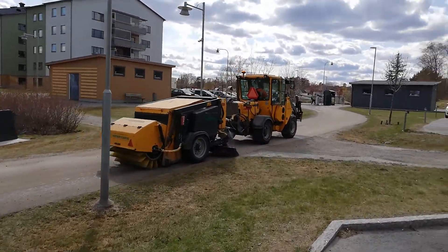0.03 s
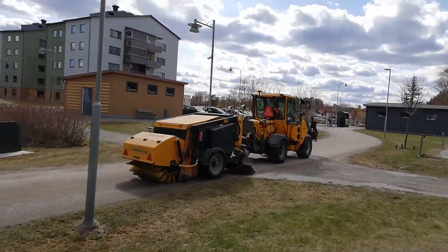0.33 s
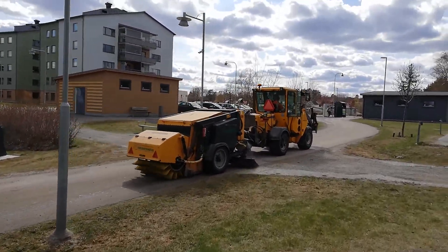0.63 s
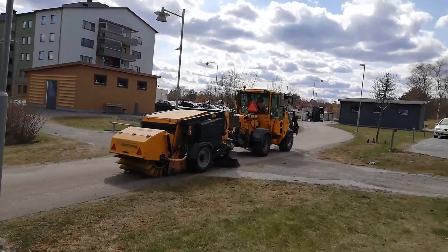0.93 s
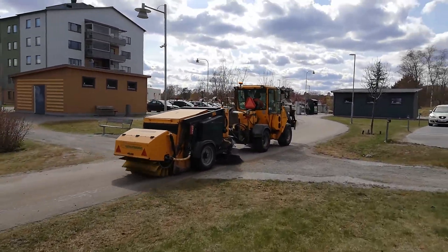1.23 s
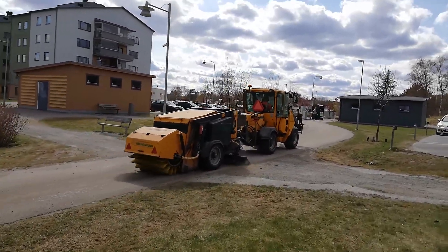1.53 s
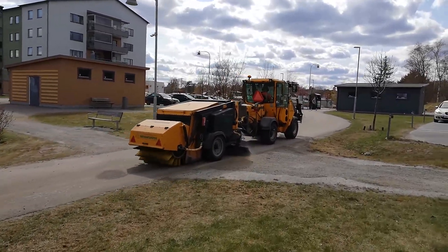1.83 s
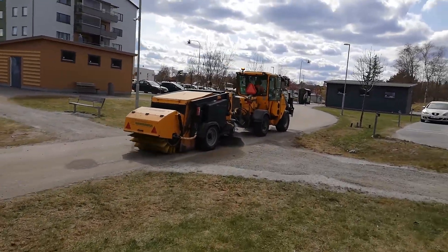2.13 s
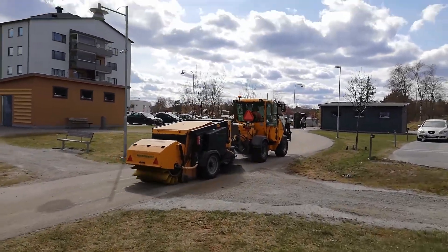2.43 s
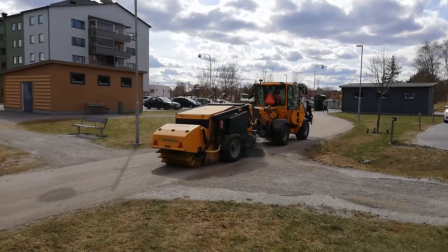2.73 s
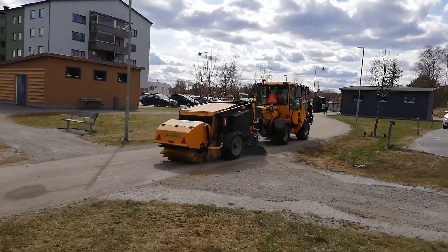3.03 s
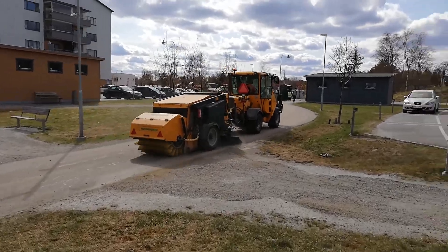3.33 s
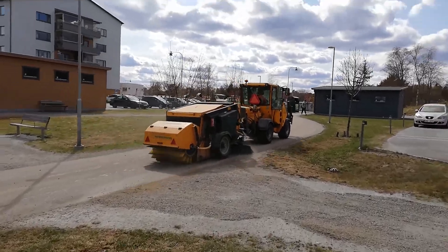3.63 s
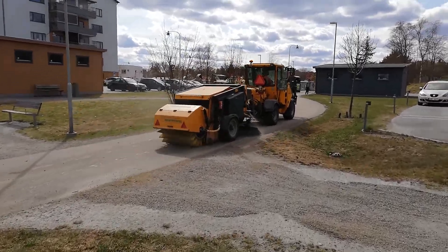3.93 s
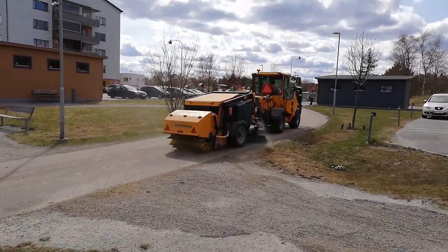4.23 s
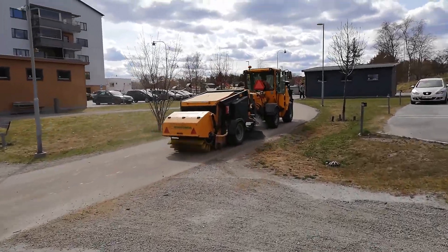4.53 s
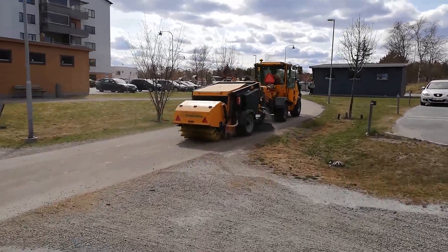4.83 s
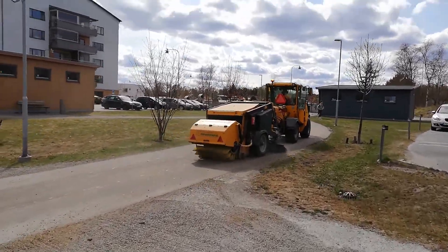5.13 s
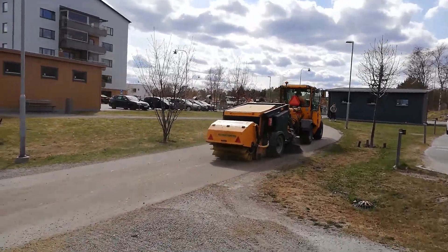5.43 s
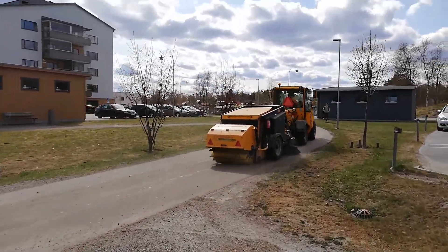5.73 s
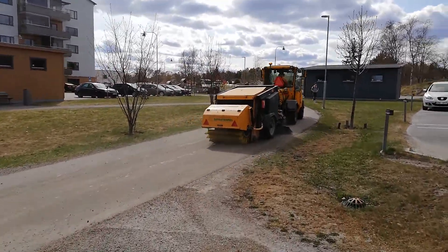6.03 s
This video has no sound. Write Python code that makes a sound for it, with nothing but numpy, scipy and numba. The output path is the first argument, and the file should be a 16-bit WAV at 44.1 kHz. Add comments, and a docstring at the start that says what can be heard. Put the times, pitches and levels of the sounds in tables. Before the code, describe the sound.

A small diesel tractor tows a rotary sweeper along a paved path, a few metres from the microphone. The engine hums and clatters steadily while the bristles make a bright, throbbing hiss over a low roar. Three dull clunks come early on. Gusts buffet the microphone from the start, then ease. Past the middle, the hiss changes tone as the machine turns away, and the wind stirs once more near the end.

```python
"""A small diesel tractor tows a rotary sweeper away along a paved path, a few metres from a phone.
From the start, gusts buffet the microphone, the engine hums and clatters, and the bristles hiss and
throb with each turn of the brush drive. In the first 1.5 s the hopper (the dirt bin) clunks three
times. Its roar echoes off a house wall on the left, which is passed at about 4 s. Around then the
machine turns its back and the hiss changes colour. The wind eases, stirring once more near the end."""
import sys
import numpy as np
from scipy import signal
from scipy.fft import rfft, irfft
from scipy.io import wavfile
from scipy.ndimage import uniform_filter1d, minimum_filter1d, map_coordinates
from numba import njit

SR = 44100
rng = np.random.default_rng(int(sys.argv[2]) if len(sys.argv) > 2 else 0)


def transcribe(u):
    """Save the signal u as a 16-bit wav file named by the first command-line argument.

    u: samples, shape (n,) or (channels, n), limited to [-1, 1]; the rate is SR.
    q: integer samples, one column per channel.
    """
    v = np.clip(np.atleast_2d(u).T, -1, 1)
    q = np.round(v * 32767).astype(np.int16)
    wavfile.write(sys.argv[1], SR, q)


N = 268569
TIME = np.arange(N) / SR
FREQ = np.arange(N // 2 + 1) * SR / N + 1e-3
PAN = np.array([[.5], [-.5]])  # splits a dB difference between the channels; positive favours the left


def undb(db):
    """Turn decibels into a factor to multiply by."""
    return 10 ** (np.asarray(db) / 20)

def unit(x):
    """Scale a signal to an average (rms) size of 1."""
    return x / np.sqrt(np.mean(x ** 2))

def curves(table):
    """Join a table's time points with straight lines, one curve per value column."""
    times, *columns = np.transpose(table)
    return [np.interp(TIME, times, column) for column in columns]

def bells(table):
    """Add up bell-shaped rises, one curve per rise column."""
    return sum(np.outer(rises, np.exp(-(2 * (TIME - s) / length) ** 2)) for s, length, *rises in table)

def shape(x, gain):
    """Filter a signal with a gain for every frequency."""
    return irfft(rfft(x) * gain, N)

def colour(table):
    """Turn a table of tone colour into a gain for every frequency, one row per dB column."""
    hz, *columns = np.transpose(table)
    return undb([np.interp(np.log(FREQ), np.log(hz), column) for column in columns])

def highpass(hz, order):
    """Gains that fade out the sound below hz; a higher order cuts more steeply."""
    return 1 / np.sqrt(1 + (hz / FREQ) ** (2 * order))

def walk(rate_hz):
    """A smooth random wobble of average size 1."""
    hold = max(int(SR / rate_hz), 1)
    steps = np.repeat(rng.standard_normal(N // hold + 1), hold)
    return unit(uniform_filter1d(uniform_filter1d(steps, hold), hold)[:N])

def flicker(rate_hz, slowest_hz=16):
    """A quick wobble with its slow part taken out."""
    wobble = walk(rate_hz)
    return unit(wobble - uniform_filter1d(wobble, int(SR / slowest_hz)))

def stereo_noise(likeness):
    """Left and right noise, from unrelated (likeness 0) to identical (1)."""
    shared = np.sqrt(likeness) * rng.standard_normal(N)
    return shared + np.sqrt(1 - likeness) * rng.standard_normal((2, N))

@njit
def sliding_filter(x, hz, damping):
    """Return the sound below a moving frequency, and the band around it."""
    low, band = np.empty(len(x)), np.empty(len(x))
    band_state, low_state = 0., 0.
    for i in range(len(x)):
        g = np.tan(np.pi * min(hz[i], .4 * SR) / SR)
        v = (band_state + g * (x[i] - low_state)) / (1 + g * (g + damping))
        low[i], band[i] = low_state + g * v, damping * v
        band_state, low_state = 2 * v - band_state, 2 * low[i] - low_state
    return low, band

def ring(pair, hz, damping):
    """Make both channels ring around hz; less damping gives a clearer pitch."""
    once = [sliding_filter(x, hz, damping)[1] for x in pair]
    return unit(np.array([sliding_filter(x, hz, damping)[1] for x in once]))

def puff(low_hz, high_hz, rise_s, order=3):
    """A short swell of noise with a peak of 1."""
    age = np.arange(SR // 10) / SR
    band = signal.butter(order, [low_hz, high_hz], "band", fs=SR, output="sos")
    swell = signal.sosfilt(band, rng.standard_normal(len(age))) * age * np.exp(-age / rise_s)
    return swell / np.abs(swell).max()


# Sharp hits of wind: (time [s], push peak [dB], thud peak [dB], slap peak [dB])
WIND_HITS = [(0.277, -29, -20, -18), (0.335, -30, -17, -15.5), (0.365, -18, -23, -16),
             (0.423, -9, -13, -14), (0.444, -23, -9.5, -13), (0.476, -30, -22, -16), (0.553, -7, -9, -11),
             (0.588, -22, -14, -29), (.64, -24, -14, -20), (0.691, -21, -16.5, -16), (0.779, -30, -10, -10),
             (.82, -33, -25, -26), (0.854, -18, -29, -30), (0.935, -28, -12, -31), (0.991, -13, -23, -22),
             (1.041, -18, -16, -18), (1.115, -27, -13.5, -40), (1.358, -19, -12.5, -25),
             (1.43, -24, -14, -30), (1.469, -25, -14, -17), (1.503, -26, -17.5, -13),
             (1.591, -17, -23, -22), (1.705, -17.5, -20, -32), (1.87, -26, -30, -29),
             (2.055, -17, -15, -30), (2.174, -19, -27, -15.5), (2.274, -16, -20.5, -28),
             (2.365, -17.5, -25, -28), (2.497, -19, -17, -11), (2.575, -35, -19, -29),
             (2.625, -32, -9, -11), (2.667, -30, -31, -15), (2.77, -28, -14, -19), (2.831, -19, -11.5, -15),
             (2.896, -30, -24, -14), (3.36, -18, -22, -35), (3.397, -23, -12, -23),
             (3.444, -20, -13.5, -21), (3.54, -23, -14.5, -36), (3.739, -19, -26, -36),
             (3.891, -22, -18, -22), (4.189, -27, -21, -26), (4.561, -25, -29, -27), (5.44, -19, -32, -42),
             (5.487, -17, -12, -21), (5.525, -17.5, -25, -30)]

def buffets(push_s=0.011, thud_s=0.00634, slap_s=0.0051):
    """Single swirls of air hit the microphone: a deep push, a dull thud and a soft slap."""
    out = np.zeros(N)
    for s, push_db, thud_db, slap_db in WIND_HITS:
        thud = undb(thud_db) * puff(88, 276, thud_s)
        slap = undb(slap_db) * puff(260, 590, slap_s, order=2)
        push = undb(push_db) * puff(23, 123, push_s)
        start = int((s - thud_s / 2) * SR)
        out[start:start + len(thud)] += thud + slap + push
    return out


# The breeze, dying down unevenly: (time [s], level [dB])
BREEZE_LEVEL = [(0, -27), (.25, -30.5), (.9, -27.5), (1.25, -35), (2.3, -28), (2.85, -29.5), (3.08, -35),
                (3.5, -35), (4.2, -37), (4.8, -47), (5.75, -32.5), (6.09, -48.5)]
# Gusts on top of the breeze: (peak time [s], length [s], rise [dB])
GUST_RISES = [(0.42, 0.25, 4.5), (0.6, 0.24, 2.5), (.79, 0.045, 4), (0.97, 0.43, 1), (1.12, 0.2, 3.5),
              (1.4, 0.25, 6.5), (1.74, 0.3, 4.2), (2.25, 0.14, 1.5), (2.5, .1, 0), (2.64, 0.11, 0.5),
              (2.81, 0.19, 3.5), (3.29, 0.055, 3.5), (3.41, 0.2, 6.5), (3.545, 0.061, 4.5), (3.87, 0.17, 4),
              (4.15, 0.11, 3), (5.485, 0.14, 0)]
# Tone colour of slow swirls of air: (frequency [Hz], relative level [dB])
RUMBLE_COLOUR = [(14, -2), (26, -5), (42, 9), (60, 7.5), (110, 5), (170, 1.5), (260, -1), (500, -22)]

def wind(flutter_db=-31.5, flutter_growth=0.91, swirl_hz=320, right_lag_s=0.00088, right_dull_hz=520):
    """Air swirls over the microphone openings; stronger gusts shed smaller swirls that flutter higher."""
    strength_db = curves(BREEZE_LEVEL)[0] + bells(GUST_RISES)[0]
    excess_db = strength_db - strength_db.mean()
    rumble = unit(shape(stereo_noise(1), colour(RUMBLE_COLOUR)))
    rumble *= undb(strength_db + 0.5 + 3 * walk(25.18))
    cutoff_hz = swirl_hz * 2 ** (excess_db / 26 + 0.14 * walk(50))  # an octave up per 26 dB
    swirls = np.array([sliding_filter(x, cutoff_hz, damping=1.9)[0] for x in stereo_noise(0.7)])
    flutter = unit(shape(swirls, highpass(83, order=3)) * undb(3 * flicker(80)))
    flutter *= undb(flutter_db + flutter_growth * excess_db)
    left, right = rumble + buffets() + shape(flutter, 1 - highpass(1040, order=3))
    # the air reaches the sheltered right opening later, and sounds duller there
    delay = np.exp(-2j * np.pi * FREQ * right_lag_s)
    shelter = 1 / np.sqrt(1 + (FREQ / right_dull_hz) ** 2)
    return np.array([left, shape(right, delay * shelter)])


# Echo off the paving: (time [s], delay [s])
ECHO_DELAY = [(0, .00146), (2.8, .00149), (3.6, .00165), (5, .00177), (5.45, .00169), (6.09, .00184)]

def paving_echo(pair, echo_db=-14.5, soft_hz=3200):
    """The paving mirrors the machine; the changing delay slides a ripple through the middle tones."""
    positions = (TIME - curves(ECHO_DELAY)[0]) * SR
    middle = shape(pair, highpass(590, order=3) / np.sqrt(1 + (FREQ / soft_hz) ** 6))
    echo = np.array([map_coordinates(x, [positions], order=1, mode="mirror") for x in middle])
    return pair + undb(echo_db) * echo


# Knocks on the hopper: (time [s], level [dB])
CLUNK_HITS = [(.358, -25), (1.037, -29), (1.463, -19.5)]
# Tones in each knock: (frequency [Hz], relative level [dB], time to fade by 60 dB [s])
CLUNK_TONES = [(753, -6, 0.062), (887, -5, 0.052), (1020, -2, 0.029)]

def clunks(attack_s=.003, pan_db=14):
    """Dull clunks, probably stones thrown against the hopper."""
    out = np.zeros((2, N))
    for s, level_db in CLUNK_HITS:
        age = np.maximum(TIME - s, 0)
        ringing = sum(undb(db - 60 * age / fade_s) * np.sin(2 * np.pi * (hz * age + rng.random()))
                      for hz, db, fade_s in CLUNK_TONES)
        out += ringing * (1 - np.exp(-age / attack_s)) * undb(level_db + PAN * pan_db)
    return out


# The drive that spins the brush: (time [s], speed [turns/s], throb strength [factor])
BRUSH_DRIVE = [(0, 18.6, 1.1), (.9, 19.05, 1.1), (1.6, 18.55, 1), (2.7, 18.45, 1), (3.5, 18.9, .8),
               (4.4, 18.95, .8), (5.2, 18.5, .8), (6.09, 18.9, .8)]

def drive():
    """The spinning drive: its turns so far, and how strongly it makes the bristles throb."""
    turn_hz, strength = curves(BRUSH_DRIVE)
    return np.cumsum(turn_hz) / SR, strength


# Tone colour of the hopper, fan and tyres: (frequency [Hz], left level [dB], right level [dB])
ROAR_COLOUR = [(25, -25, -21), (85, -16.5, -20), (141, -15.5, -13.5), (172, -26, -32), (219, -15, -20),
               (314, -26, -24.5), (436, -36, -29), (560, -30.5, -22.5), (685, -29.5, -26),
               (815, -33, -24.5), (935, -27.5, -29), (1620, -32, -25.5), (2180, -25, -21.5)]
# The roar swells while the house wall throws it back: (time [s], left gain [dB], right gain [dB])
WALL_SWELL = [(0, 5, -0.5), (1.5, 6, 1), (2.8, 6.5, 2.5), (4, 3, 2), (4.5, -1, 2.5), (5.2, -4.5, 1),
              (6.09, -6, 0.5)]

def hopper(shake_db=-42, drone_db=-46, waver_db=2):
    """The hopper roars with fan and tyre noise, shakes twice per turn of the drive, and drones."""
    apart = highpass(307, order=2)  # long waves reach both sides alike, short ones differ
    air = shape(stereo_noise(0.84), np.sqrt(1 - apart ** 2)) + shape(stereo_noise(0.25), apart)
    roar = shape(air, colour(ROAR_COLOUR) * (1 - highpass(1960, order=4))) * undb(curves(WALL_SWELL))
    turns, _ = drive()
    shake = np.sqrt(2) * np.sin(2 * np.pi * 2 * turns)
    drone = np.sqrt(2) * np.sin(2 * np.pi * 6 * turns)
    return roar + shake * undb(shake_db) + drone * undb(drone_db + waver_db * walk(3.7))


# The engine's steady running: (time [s], firing rate [Hz], hum level [dB])
ENGINE_RUN = [(0, 62.4, -35.5), (2, 62.45, -34.5), (3.1, 62.55, -35), (3.6, 62.6, -34.5), (4.6, 62.45, -38),
              (5.3, 62.45, -36), (6.09, 62.4, -36.8)]
# Exhaust and pump tones: (multiple of the firing rate [factor], relative level [dB])
HUM_TONES = [(1, -7.5), (1.5, -15), (2, 0), (3, -6.5), (6.5, -20.5), (8, -22.5), (13, -21.5)]
# Clatter from the engine bay: (time [s], ringing frequency [Hz], level [dB])
BAY_CLATTER = [(0, 1450, -48.5), (1, 1450, -45.5), (2.8, 1380, -45.5), (3.5, 1340, -39), (4, 1304, -39),
               (5, 1205, -42), (5.45, 1300, -39.5), (6.09, 1210, -41)]

def engine(waver_db=2.5, sway_cycles=0.08, knock_db=2.5, drift=0.031, tick_hz=3250, tick_db=-44):
    """The diesel's exhaust hums, and each firing knocks the engine bay and block into ringing."""
    firing_hz, hum_db = curves(ENGINE_RUN)
    firings = np.cumsum(firing_hz * (1 + 0.00206 * walk(7.94))) / SR
    hum = np.zeros(N)
    for multiple, db in HUM_TONES:  # moving air makes each tone waver in level and timing
        level = undb(db + waver_db * flicker(28, slowest_hz=8.6))
        cycles = multiple * firings + rng.random() + sway_cycles * walk(9)
        hum += level * np.sin(2 * np.pi * cycles)
    knocks = stereo_noise(1) * undb(knock_db * np.cos(2 * np.pi * firings))
    bay_hz, clatter_db = curves(BAY_CLATTER)
    clatter = ring(knocks, bay_hz * (1 + drift * walk(12)), damping=0.25)
    clatter *= undb(clatter_db + walk(20) - 4.5 * PAN)
    ticking = ring(knocks, tick_hz * (1 + drift * walk(7)), damping=0.18) * undb(tick_db - 7 * PAN)
    return np.sqrt(2) * hum * undb(hum_db) + clatter + ticking


def bristles(flicks_per_s=9000, spread_db=7, flick_share=0.16):
    """Bristles scrape the paving and their tips snap free: many small ticks, a few large."""
    sizes = undb(spread_db * np.minimum(rng.exponential(size=N), 4))
    snaps = rng.random(N) < flicks_per_s / SR
    flicks = unit(snaps * np.sign(rng.standard_normal(N)) * sizes)
    left, right = np.sqrt(flick_share) * flicks + np.sqrt(1 - flick_share) * stereo_noise(0.12)
    # the sound reaches the left side first until the machine is straight ahead
    lag_samples = np.linspace(6, 0, N).round().astype(int)
    return np.array([left, right[np.arange(N) - lag_samples]])


# Our view of the sweeper; the left microphone opening is shaded once the house is passed:
# (time [s], share seen from behind [0-1], shade on the left [0-1])
SWEEPER_VIEW = [(0, 0.15, 0.44), (3.2, 0.24, 0.18), (3.9, 0.7, 0.43), (4.13, 0.9, 0.6), (4.24, 0.85, 0.9),
                (4.5, 0.8, 0.7), (4.62, 0.7, 1), (5.02, 0.6, 1), (5.15, 0.74, 0.86), (5.8, 1, 1),
                (6.09, 0.9, 1)]
# Tone colour of the hiss from the side: (frequency [Hz], left gain [dB], right gain [dB])
SIDE_COLOUR = [(1910, -4.5, -4), (2590, -2, -1.5), (3020, -.5, 2.5), (3400, -2, 5.5), (4300, -3.2, 2.4),
               (5200, -1, -1.5), (6500, 2, -2), (7850, 6.3, 7.5), (8660, 5.5, 14.5), (9390, 4.5, 18.7),
               (10820, -2.5, 8.7), (12200, -4.5, 3.2), (14500, -7, 3.2), (15700, -9, 4.5)]
# Tone colour of the hiss from behind: (frequency [Hz], left gain [dB], right gain [dB])
REAR_COLOUR = [(1900, -5, -5), (2250, -7, 0), (2550, -9, .5), (2850, -8, 5.8), (3490, -9, 6),
               (4430, -8, -2), (5300, -5, -3.5), (6200, -5.5, -3.5), (7500, -2.8, 9.5), (8900, -2.2, 14.8),
               (9420, -4, 14.6), (11040, -8.5, 7.2), (12000, -11.5, 8), (13300, -13.5, 5),
               (14400, -15.5, -1), (15700, -18, 0)]

def turn_away(hiss):
    """As the machine turns its back, the hiss blends from its side colour to its rear colour."""
    behind, shade = curves(SWEEPER_VIEW)
    low_cut = highpass(1800, order=6)
    side = shape(hiss, colour(SIDE_COLOUR) * low_cut)
    rear = shape(hiss, colour(REAR_COLOUR) * low_cut)
    rear_share = np.array([shade, behind])
    return (1 - rear_share) * side + rear_share * rear


# A deepening dip in the treble: (time [s], centre [Hz], gain [dB])
TREBLE_DIP = [(0, 11400, 0.7), (3.7, 11400, -4), (4.5, 11100, -7), (5.3, 10700, -6), (6.09, 10800, -11)]
# A faint peak that climbs through the hiss: (time [s], centre [Hz], gain [dB])
TREBLE_PEAK = [(0, 5200, 0), (2.4, 6000, 2), (3, 6400, 4.5), (4.05, 6700, 0), (4.5, 7400, 3),
               (5.0, 8300, 1.3), (5.3, 12200, 1), (5.8, 12400, 3.5), (6.09, 12400, 2)]

def sliding_tints(hiss):
    """A narrow dip and a narrow peak slide through the hiss."""
    for table, damping in ((TREBLE_DIP, 0.19), (TREBLE_PEAK, 0.13)):
        hz, db = curves(table)
        hiss = hiss + (undb(db) - 1) * sliding_filter(hiss, hz, damping)[1]
    return hiss


# Overall loudness of the brush: (time [s], level [dB])
HISS_LEVEL = [(0, -24), (.45, -24.5), (1.4, -25), (2.3, -23.5), (2.9, -24), (3.3, -22), (3.8, -22.5),
              (4.5, -23), (6.09, -23)]
# The brush bears down: (peak time [s], length [s], rise [dB], extra rise of the top treble [dB])
HARD_SCRAPES = [(.1, .14, 2.3, 0), (.26, 0.14, 3.3, 0), (.685, 0.093, 0, 4), (.96, 0.24, 1.5, -0.5),
                (1.21, 0.22, 2.3, 1), (1.54, 0.25, 2.5, -0.5), (1.75, 0.21, 1, .3), (2.07, 0.23, 2.5, 1.2),
                (2.34, 0.1, 0, 1.5), (2.54, 0.19, 0.7, 2), (3.3, 0.1, 0, 1), (3.54, 0.13, .8, 2),
                (4.56, 0.13, -0.5, 2)]
# Throb of the bristles: (pulses per drive turn [count], depth before scaling [dB])
THROB_PULSES = [(2, 1.35), (3, 1), (4, 1)]

def brush(tips_hz=5500, left_throb=0.18, rasp_throb=0.35, edge_hz=10800, edge_octaves=0.47):
    """The brush hisses on the paving and throbs as its pressure eases a few times in each drive turn."""
    turns, strength = drive()
    turns += rng.random()
    scrape_db, edge_db = bells(HARD_SCRAPES)
    swell_db = scrape_db + 0.56 * walk(12)
    throb_db = -strength * sum(db * np.cos(2 * np.pi * pulses * turns) for pulses, db in THROB_PULSES)
    # the shaded left side hears mostly reflections, which even out the throb
    throb_db = throb_db * np.array([[left_throb], [1]])
    scrape = bristles()
    tips = shape(scrape, highpass(tips_hz, order=4))
    rasp = scrape - tips
    # the bright tips throb more than the lower rasp; both flicker
    rasp *= undb(swell_db + rasp_throb * throb_db + 1.4 * flicker(240, slowest_hz=30))
    tips *= undb(swell_db + throb_db + 1.12 * flicker(220, slowest_hz=30))
    left, right = turn_away(rasp + tips)
    # on the right, hard scrapes lift the top edge of the hiss
    edge = shape(right, np.exp(-(np.log2(FREQ / edge_hz) / edge_octaves) ** 2))
    right = sliding_tints(right + edge * (undb(edge_db) - 1))
    return np.array([left, right]) * undb(curves(HISS_LEVEL)[0])


def scene():
    """The machine and its echo off the paving, with the clunks and the wind."""
    return paving_echo(brush() + engine() + hopper()) + clunks() + wind()

def record(dry, ceiling=.76, top_hz=15900):
    """The phone turns both channels down around the highest peaks and cuts the very top treble."""
    window = SR // 200  # 5 ms
    gain = np.minimum(1, ceiling / (np.abs(dry).max(axis=0) + 1e-9))
    gain = uniform_filter1d(minimum_filter1d(gain, window), window)
    top_cut = signal.ellip(12, .1, 80, top_hz, fs=SR, output="sos")
    return signal.sosfilt(top_cut, dry * gain)


dry = scene()
out = record(dry)
transcribe(out)
```